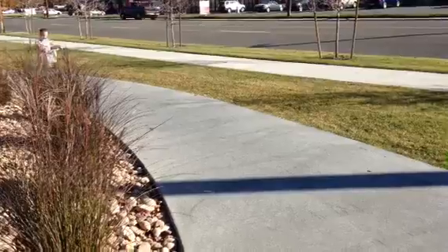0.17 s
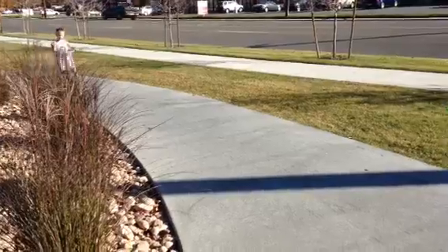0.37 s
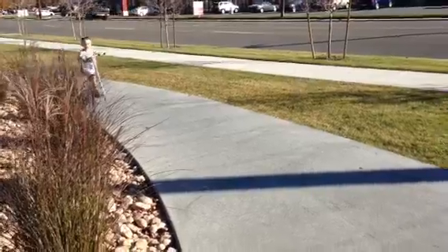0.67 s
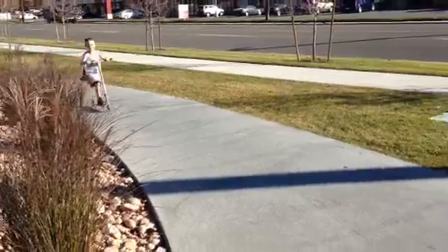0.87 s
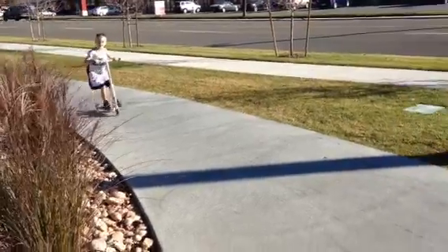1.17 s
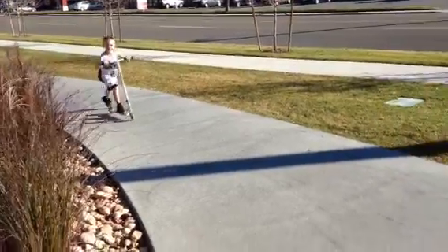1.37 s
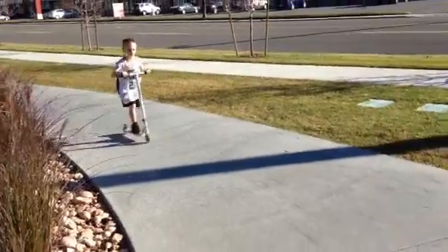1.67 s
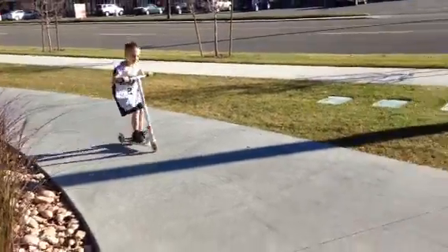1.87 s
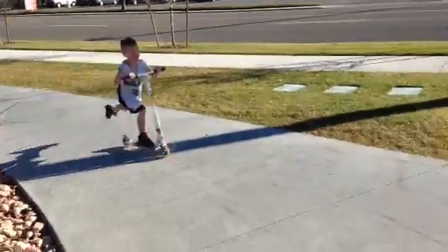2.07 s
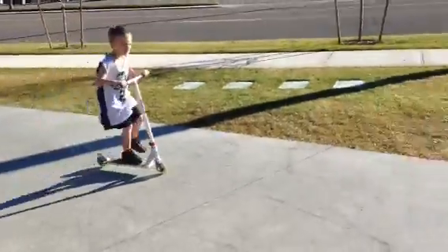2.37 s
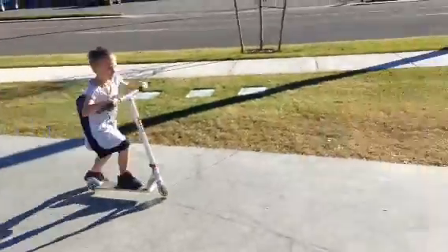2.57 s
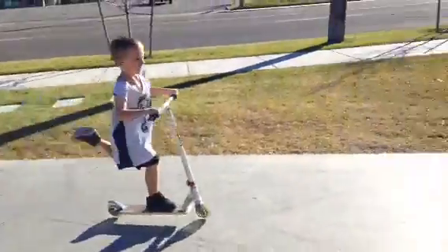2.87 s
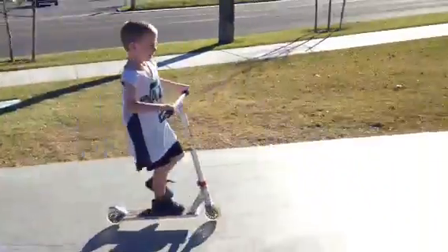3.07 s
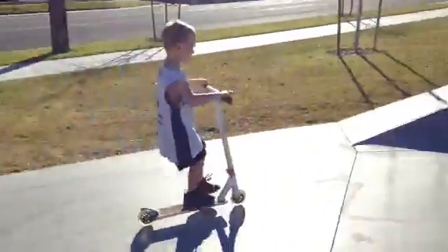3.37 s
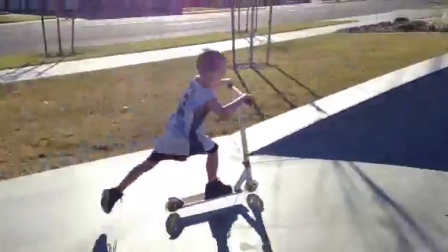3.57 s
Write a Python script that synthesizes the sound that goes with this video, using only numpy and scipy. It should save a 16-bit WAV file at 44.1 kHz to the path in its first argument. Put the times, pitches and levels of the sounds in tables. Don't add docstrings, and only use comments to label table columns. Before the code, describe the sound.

Low unsteady truck drone and road hiss open, with light wind puffs on a phone; then a kick scooter rolls near, its loose metal joints chattering over path joints, ending with a sharp clack and rattles.

```python
import sys
import numpy as np
from scipy import signal
from scipy.fft import rfft, irfft, next_fast_len
from scipy.io import wavfile
from scipy.ndimage import uniform_filter1d, map_coordinates

SR = 44100
rng = np.random.default_rng(int(sys.argv[2]) if len(sys.argv) > 2 else 0)


def invert_db(x):
    u = np.asarray(x, float) / 20
    return 10 ** u


def store_pcm(level_fs):
    pcm = np.round(np.clip(level_fs, -1, 1) * 32767).astype(np.int16)
    wavfile.write(sys.argv[1], SR, np.atleast_2d(pcm).T)


N = 163611
TIME_S = np.arange(N) / SR


def unit(x):
    return x / np.sqrt(np.mean(x ** 2) + 1e-20)


def curves(rows):
    s, *cols = np.transpose(rows)
    return [np.interp(TIME_S, s, c) for c in cols]


def wobble(rate):
    return map_coordinates(rng.standard_normal(400), [np.arange(N) * rate / SR])


def filtered(x, response):
    m = next_fast_len(len(x) + 8192)
    return irfft(rfft(x, m) * response(np.fft.rfftfreq(m, 1 / SR)), m)[:len(x)]


def resonances(peaks):
    def response(f):
        total = 0
        for k, (hz, width, db) in enumerate(peaks):
            damping = 1j * f * width
            total = total + (-1) ** k * invert_db(db) * damping / (hz * hz - f * f + damping)
        return total
    return response


def below(response, top_hz):
    return lambda f: response(f) / (1 + 1.4j * f / top_hz - (f / top_hz) ** 2) ** 2


def rush(spectrum, patchy_db):
    z = signal.stft(rng.standard_normal(N), nperseg=512)[2]
    field = uniform_filter1d(rng.standard_normal(z.shape), size=6, axis=0)
    field = uniform_filter1d(field, size=12, axis=1)
    x = signal.istft(z * invert_db(patchy_db * unit(field)), nperseg=512)[1][:N]
    f, db = np.transpose(spectrum)
    return unit(filtered(x, lambda hz: invert_db(np.interp(np.log(hz + 1), np.log(f + 1), db))))


# t/s, level/dB
ROAD_LEVEL = [(0, -46), (.2, -51.5), (.4, -51.5), (.65, -50.5), (.85, -54), (1.1, -53.5), (1.4, -55),
              (1.8, -55.5), (2.2, -56), (2.93, -57.5), (3.4, -54), (3.71, -51)]
# f/Hz, level/dB per Hz
TYRE_COLOUR = [(180, -64.5), (300, -12.5), (371, -13.5), (471, -11.5), (583, -10.5), (871, -9.5),
               (1440, -12.5), (1570, -14), (6000, -38.5), (7800, -49), (13200, -120)]
# f/Hz, level/dB per Hz
HISS_COLOUR = [(2650, -2), (4500, -15), (5550, -10), (8190, -10), (15300, -10.5)]


def road():
    level_db, = curves(ROAD_LEVEL)
    roar = invert_db(level_db + 1.06 * wobble(4.54)) * rush(TYRE_COLOUR, patchy_db=1.42)
    return roar + invert_db(-66) * rush(HISS_COLOUR, patchy_db=1.5)


# t/s, level/dB, exhaust boom/dB
TRUCK_LEVEL = [(0, -35.5, 8), (.15, -43, -1.5), (.35, -43.5, 0), (.6, -42.5, -0.5), (.85, -41.5, -6.5),
               (1.1, -41, 1.5), (1.35, -43.5, -3.5), (1.55, -41.5, 1), (1.75, -44, -2.5), (1.95, -46, -2),
               (2.05, -43.5, -27), (2.25, -43, -31), (2.5, -46.5, -17.5), (2.75, -48, -16), (3.1, -50, -17),
               (3.4, -50.5, -18), (3.71, -57, -20)]
# t/s, cycle f/Hz
ENGINE_CYCLE = [(0, 14.45), (.3, 14.33), (1.6, 14.33), (1.9, 14.05), (2.25, 13.15), (2.5, 12.9),
                (2.8, 12.4), (3.71, 11.5)]
# multiple of the cycle, level/dB, share of the boom [0-1]
ENGINE_ORDERS = [(8, 1.5, 1), (11, -2, 0.88), (13, -13, 0), (14, -2, 0.072), (16, 2, 0.0078),
                 (17, -9, 0.16), (20, -10, 1), (24, -16.5, 0.7), (33, -14.5, 0.46)]
# f/Hz, level/dB per Hz
DRONE_COLOUR = [(30, -46), (60, -28.5), (98, -23), (125, -8), (200, -4), (292, -14), (420, -27.5),
                (1100, -120)]


def truck():
    tone_db, flutter_db, drone_db = -6, 2.05, -8
    cycle_hz, = curves(ENGINE_CYCLE)
    level_db, boom_db = curves(TRUCK_LEVEL)
    turn = 2 * np.pi * np.cumsum(cycle_hz) / SR
    orders = np.zeros(N)
    for multiple, db, share in ENGINE_ORDERS:
        gain = invert_db(db + share * boom_db + flutter_db * wobble(8.29))
        start = 2 * np.pi * rng.random()
        orders += gain * np.sin(multiple * turn + 0.25 * wobble(5.85) + start)
    loudest = level_db.max()
    drone_level = loudest + 0.34 * (level_db - loudest) + drone_db + 0.088 * boom_db + 0.61 * wobble(12)
    return invert_db(level_db + tone_db) * orders + invert_db(drone_level) * rush(DRONE_COLOUR, patchy_db=1.9)


# t/s, level/dB, length/s
WIND_PUFFS = [
    (.1, -53, .04),
    (.684, -61, .06),
    (1.05, -63, 0.17),
    (1.52, -62, .05),
    (1.66, -49, 0.032),
    (2.17, -66, .05),
    (2.64, -74, .04),
    (2.826, -66, .05),
    (3.057, -62, 0.033),
    (3.34, -59, .04),
]
# f/Hz, level/dB
PUFF_COLOUR = [(15, -36), (35, -13), (70, -3), (115, 0), (170, -30), (300, -86)]


def wind():
    air = rush(PUFF_COLOUR, patchy_db=11.0)
    out = np.zeros(N)
    for s, db, length in WIND_PUFFS:
        shape = np.exp(-((TIME_S - s) / (.5 * length)) ** 2)
        puff = shape * air
        out += invert_db(db) * puff * np.linalg.norm(shape) / np.linalg.norm(puff)
    return out


# t/s, level/dB
STALK_LEVEL = [(1.02, -100), (1.1, -77), (1.2, -74), (1.3, -79), (1.37, -100)]
# f/Hz, level/dB per Hz
STALK_COLOUR = [(5500, -36), (6900, -5), (7600, -3), (8400, -7), (10000, -18), (14000, -80)]


def scrape():
    return invert_db(curves(STALK_LEVEL)[0] + 2.7 * wobble(40)) * rush(STALK_COLOUR, patchy_db=3)


# t/s, level/dB
BEARING_LOW = [(2.3, -100), (2.5, -69), (2.75, -64.5), (3, -66), (3.07, -71), (3.45, -75), (3.6, -72),
               (3.71, -71)]
# t/s, level/dB
BEARING_HIGH = [(2.8, -88), (2.9, -78), (3.05, -76), (3.1, -70), (3.13, -84), (3.25, -110)]


def bearing():
    out = np.zeros(N)
    for rows, hz in ((BEARING_LOW, 2940), (BEARING_HIGH, 4650)):
        note = resonances([(hz, 180, 0)])
        sung = unit(filtered(rng.standard_normal(N), lambda f: note(f) ** 2))
        out += invert_db(curves(rows)[0] + 2.1 * wobble(60)) * sung
    return out


# t/s, level/dB
ROLL_LEVEL = [(0, -81), (1, -74), (1.7, -65.5), (2.1, -65), (2.4, -63), (2.6, -58), (2.75, -59),
              (2.95, -57.5), (3.05, -58.5), (3.2, -58), (3.3, -61), (3.42, -55.5), (3.5, -55.5),
              (3.56, -56), (3.63, -57), (3.71, -61.5)]
# f/Hz, width/Hz, level/dB
FRAME_PEAKS = [(690, 870, -1.5), (1480, 360, 5), (1890, 240, 1.5), (3000, 1180, -2), (3746, 240, 1.5),
               (4360, 560, -3)]


def rolling():
    turns_per_s, turn_db, loud_moment_s = 10.8, 2, 2.812
    level_db, = curves(ROLL_LEVEL)
    turn = np.cos(2 * np.pi * turns_per_s * (TIME_S - loud_moment_s))
    grain = np.minimum(rng.exponential(size=N // 32 + 1), 3).repeat(32)[:N]
    grit = rng.standard_normal(N) * invert_db(2.2 * grain)
    shake = invert_db(turn_db * turn + 2.8 * np.clip(wobble(45), -2, 2))
    return invert_db(level_db) * unit(shake * filtered(grit, below(resonances(FRAME_PEAKS), 4500)))


# t/s, peak level/dB, f/Hz
FOOTBOARD_THUDS = [
    (2.4796, -38.5, 374),
    (2.589, -44, 700),
    (3.177, -42, 370),
    (3.447, -44, 450),
]


def thuds():
    t60_s = 0.043
    out = np.zeros(N)
    for s, db, hz in FOOTBOARD_THUDS:
        t = TIME_S - s
        out += invert_db(db - 60 * np.abs(t) / t60_s) * (t > 0) * np.sin(2 * np.pi * hz * t)
    return out


# t/s, peak level/dB, bright over dull/dB, length/s
JOINT_RATTLES = [(2.046, -44, 4, 0.015), (2.095, -50, 10, 0.024), (2.1994, -65, 0, 0.012),
                 (2.388, -43, 1, 0.011), (2.477, -34, 2, 0.013), (2.4812, -40, 3, 0.007),
                 (2.421, -52, -7, .01), (2.4875, -39, 12, 0.008), (2.532, -56, 11, 0.012),
                 (2.567, -38.5, -2, 0.021), (2.574, -44, 2, 0.014), (2.6432, -34.5, 0, 0.008),
                 (2.648, -34, -1, 0.0092), (2.6533, -34, 15, 0.0099), (2.658, -34.5, -1, 0.0092),
                 (2.666, -37.5, 2, 0.017), (2.7413, -63, 8, 0.012), (2.802, -40.5, 3, 0.014),
                 (2.852, -48, 6, 0.01), (2.8928, -35.5, -16, 0.012), (2.9025, -43, -1, 0.011),
                 (2.912, -39, -3, 0.015), (2.948, -48, -2, 0.009), (2.988, -41, -2, 0.012),
                 (3.014, -45, -4, 0.011), (3.033, -45.5, -1, .008), (3.136, -51, 3, 0.0089),
                 (2.9973, -39, 4, 0.0095), (3.0844, -33.5, -8, 0.0063), (3.104, -39, -1, 0.014),
                 (3.1769, -30, 4, 0.008), (3.1795, -32.5, 6, 0.013), (3.189, -40.5, 7, 0.018),
                 (3.358, -37, 3, 0.01), (3.402, -49, 18, 0.011), (3.4233, -44, -2, 0.0091),
                 (3.446, -39.5, 1, 0.015), (3.527, -37.5, -5, 0.0096), (3.532, -39, 2, .012),
                 (3.543, -42, -3, 0.0081), (3.557, -38.5, -9, 0.01), (3.586, -43, 8, .008),
                 (3.604, -31.5, -5, 0.0055), (3.612, -36.5, -3, 0.018)]


def rattles():
    sizzle_hz, sizzle_width_hz, sizzle_db = 6340, 2800, -22.5
    out, t = np.zeros(N + SR), np.arange(SR // 10) / SR
    edge = resonances([(sizzle_hz, sizzle_width_hz, 0)])
    for s, db, bright_db, length in JOINT_RATTLES:
        chance = rng.standard_normal(len(t))
        shape = np.exp(-t / (length * .35)) * (1 - np.exp(-t / .0006))
        grain = chance[::-24].repeat(24)[:len(t)]
        burst = chance * shape * invert_db(2.5 * grain)
        peaks = []
        for (hz, width, gain_db), shift in zip(FRAME_PEAKS, .025 * chance[-6:]):
            peak_db = gain_db + 60 * shift + bright_db * (hz > 3300)
            peaks.append((hz * (1 + shift), width * 0.81, peak_db))
        frame = below(resonances(peaks), 5000)
        sizzle_gain = invert_db(sizzle_db + bright_db / 2)
        ring = filtered(burst, lambda f: frame(f) + sizzle_gain * edge(f) ** 2)
        out[round(s * SR):][:len(t)] += invert_db(db - 8) * 2 * ring / np.abs(ring).max()
    return out[:N]


# t/s, peak level/dB, centre f/Hz, width/Hz, deck ring level/dB
JOINT_CLACKS = [(0.351, -62, 2180, 3000, -8), (.641, -39.5, 4640, 4030, 0), (.666, -48.5, 6800, 1500, -13),
                (1.17, -45, 3500, 3000, -10), (1.316, -50, 3600, 3000, 5.5), (1.954, -58, 2800, 1800, 9.5),
                (2.5894, -30.5, 3600, 9000, 0), (2.5945, -59, 6000, 5000, -5),
                (3.178, -55, 3670, 3200, -14), (3.4987, -21.5, 2700, 2630, -6.5),
                (3.5002, -34, 2200, 2600, -4), (3.4987, -37, 8300, 2400, -19)]
# f/Hz, width/Hz, level/dB
DECK_PEAKS = [(784.4, 310, 4), (1730, 280, 6.5), (2000, 270, 2), (2650, 560, -1), (3170, 220, 3),
              (4330, 1300, -1)]


def clacks():
    t60_s, ring_gain_db, clack_db = 0.006, 4.5, -6.5
    out, t = np.zeros(N + SR), np.arange(SR // 10) / SR
    deck = below(resonances(DECK_PEAKS), 5000)
    for s, db, hz, width, ring_db in JOINT_CLACKS:
        blow = (.08 * rng.standard_normal(len(t)) - (t == 0)) * invert_db(-60 * t / t60_s)
        narrow = below(resonances([(hz, width, 0)]), min(11600, hz + .6 * width))
        wide = resonances([(hz, 2 * width, 0)])
        crack = filtered(blow, lambda f: narrow(f) * wide(f))
        both = crack + invert_db(ring_gain_db + ring_db) * filtered(blow, deck)
        out[round(s * SR):][:len(t)] += invert_db(db + clack_db) * 2 * both / np.abs(crack).max()
    return out[:N]


def scene():
    background = road() + truck() + wind() + scrape()
    scooter = bearing() + rolling() + thuds() + rattles() + clacks()
    return (background + scooter)[None]


def low_pass(x):
    return signal.sosfilt(signal.butter(12, 15590, fs=SR, output="sos"), x)


def record(dry):
    start_s, fade_s, top_hz = 0.084, 0.00026, 15320
    opened = dry[0] * np.clip((TIME_S - start_s) / fade_s, 0, 1)
    limited = filtered(opened, lambda f: f < top_hz)
    mix = limited[None] * (TIME_S > start_s - .002)
    return low_pass(mix)


dry = scene()
out = record(dry)
store_pcm(out)
```